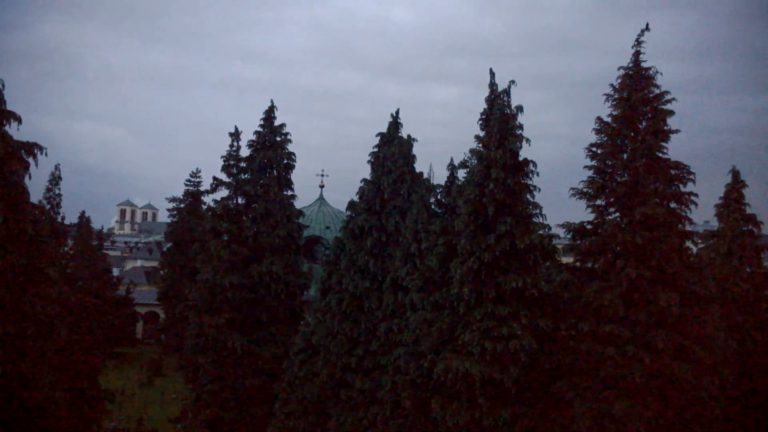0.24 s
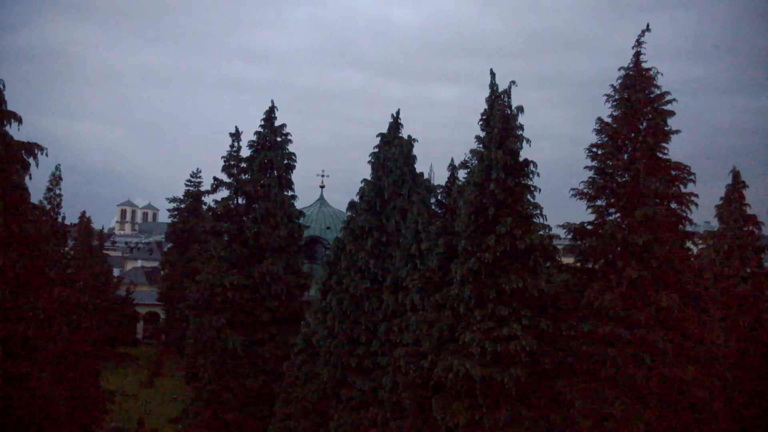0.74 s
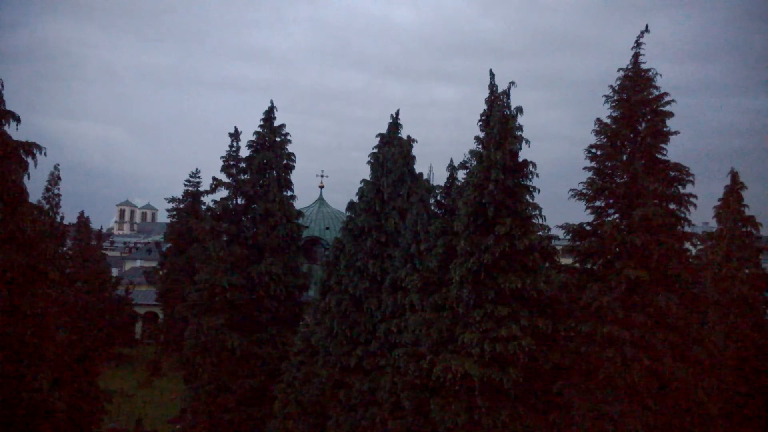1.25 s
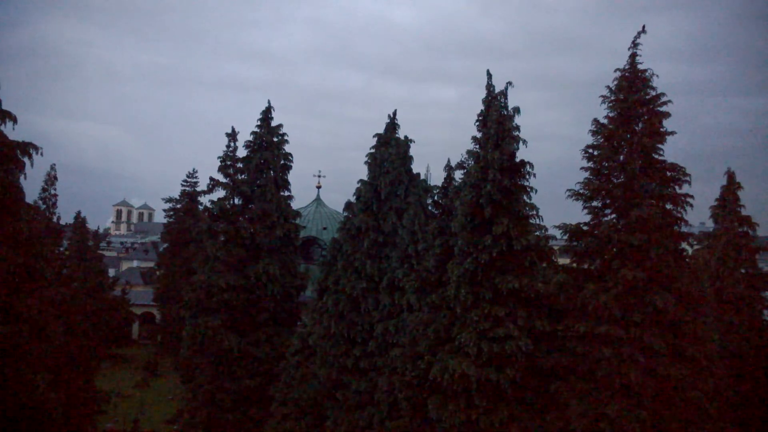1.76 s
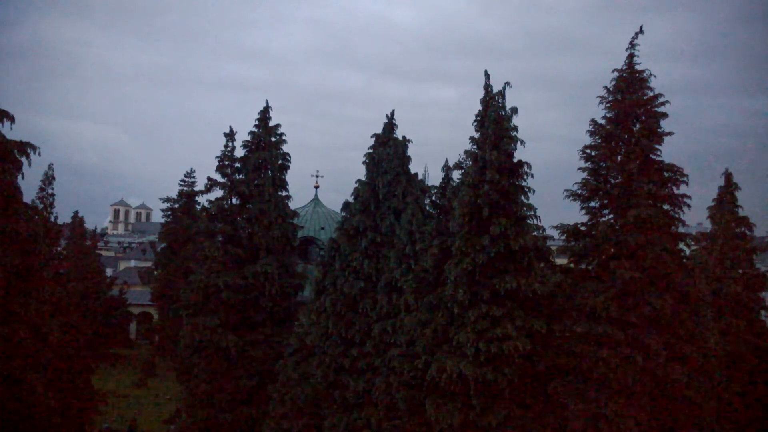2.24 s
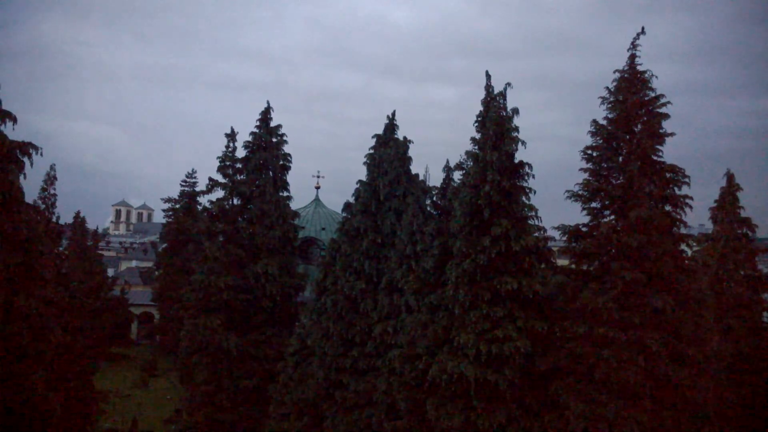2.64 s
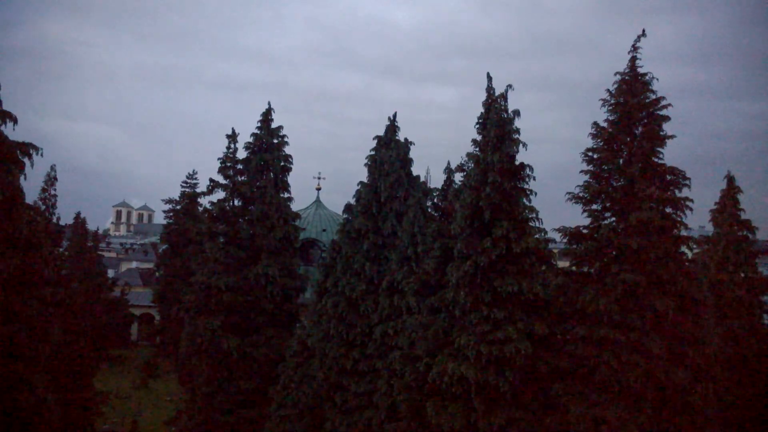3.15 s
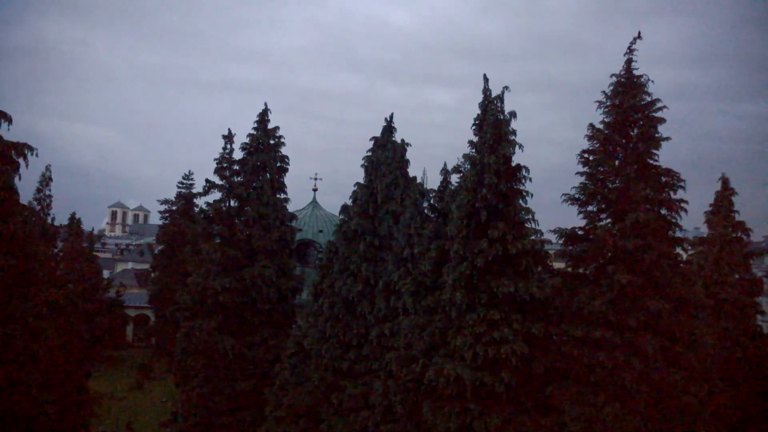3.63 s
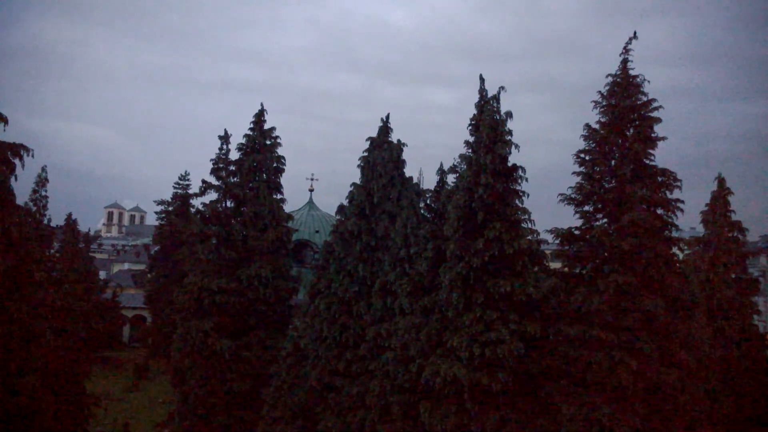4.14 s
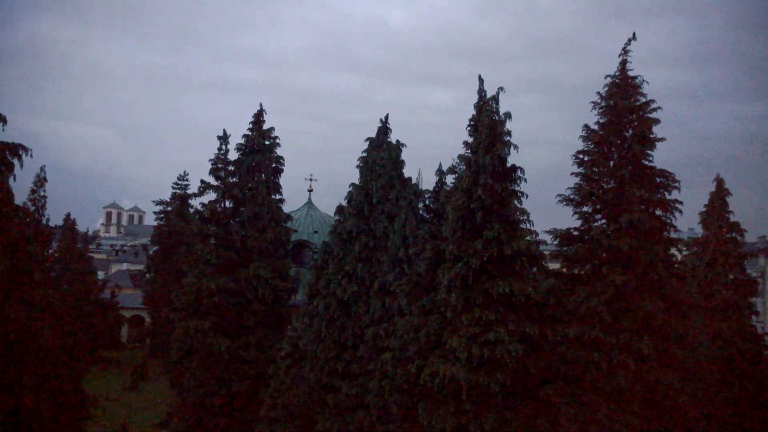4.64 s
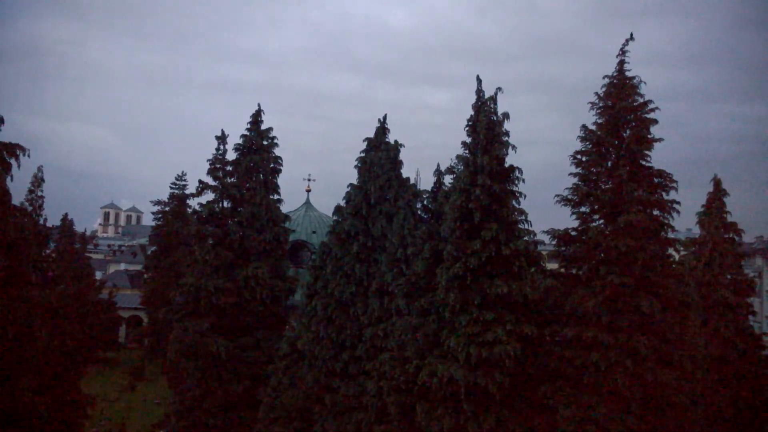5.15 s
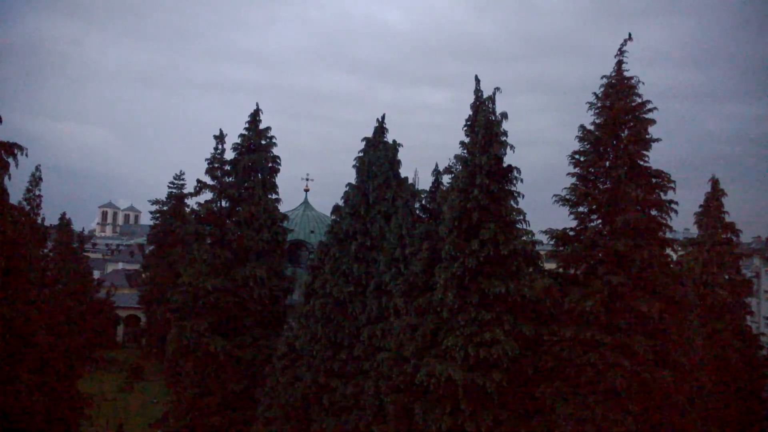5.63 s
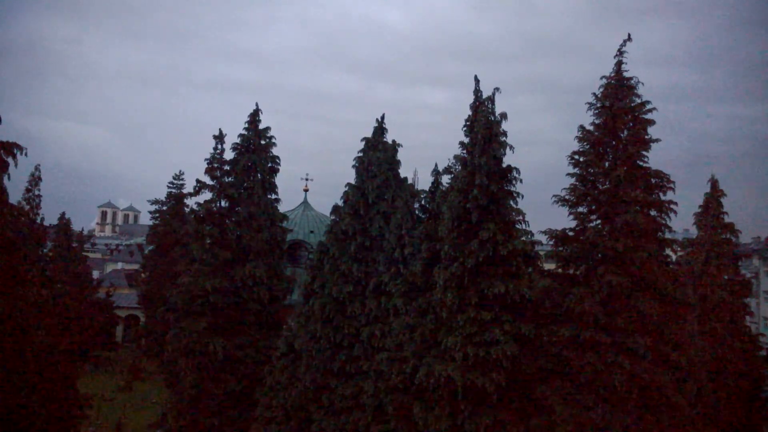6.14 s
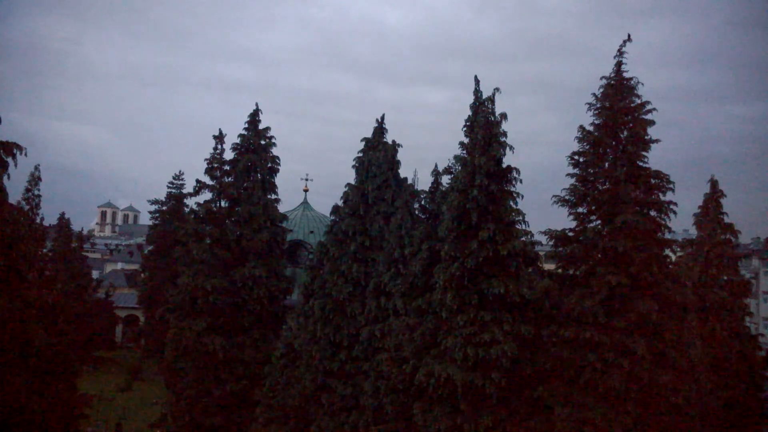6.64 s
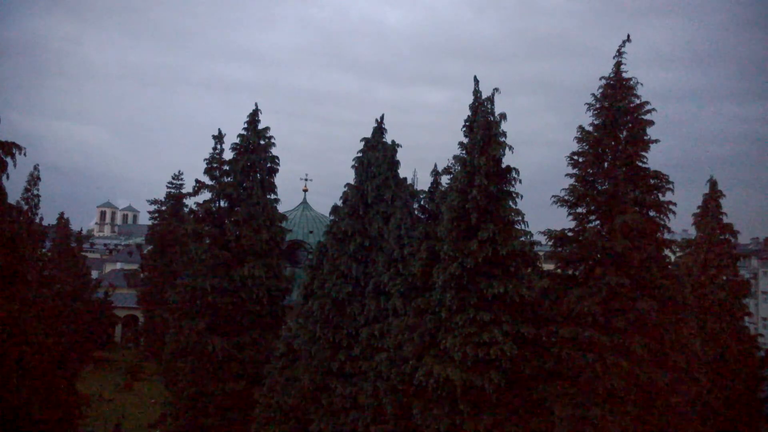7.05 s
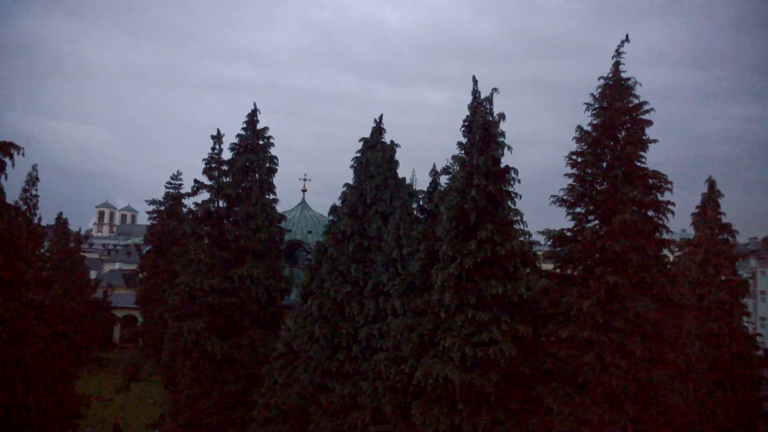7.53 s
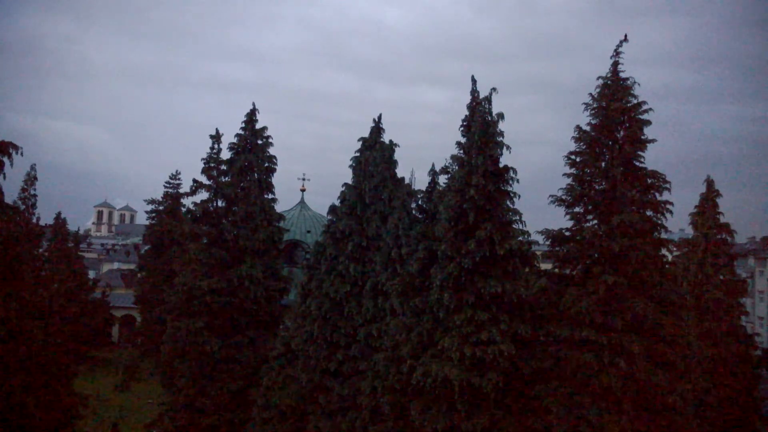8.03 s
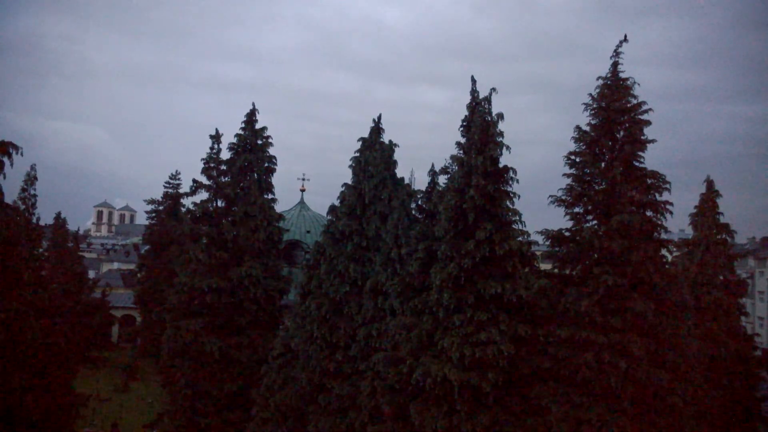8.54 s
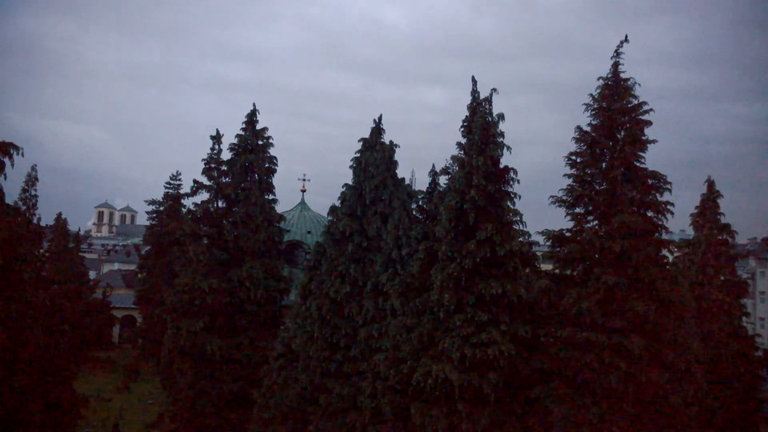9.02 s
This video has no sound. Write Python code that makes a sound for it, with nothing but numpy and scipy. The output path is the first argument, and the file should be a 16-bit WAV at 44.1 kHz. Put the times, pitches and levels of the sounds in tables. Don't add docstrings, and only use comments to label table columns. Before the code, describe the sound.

Outdoors among conifers at dawn, a nearby blackbird whistles, warbles and rasps in two phrases, with distant birds and faint steady traffic rumble behind.

```python
import sys
import numpy as np
from scipy import signal
from scipy.fft import rfft, irfft, next_fast_len
from scipy.io import wavfile
from scipy.ndimage import uniform_filter1d

SR = 44100
rng = np.random.default_rng(int(sys.argv[2]) if len(sys.argv) > 2 else 0)


def materialize(psi):
    bounded = np.clip(np.atleast_2d(psi).T, -1, 1)
    quanta = np.round(bounded * 32767).astype(np.int16)
    wavfile.write(sys.argv[1], SR, quanta)


def volts_from_db(level):
    exponent = np.asarray(level, float) / 20
    return 10 ** exponent


N = 409248


# time in seconds, pitch in Hz, level in dB.
CHIRPS = [
    [(2.9, 2920, -48.5), (2.93, 3210, -47.5), (2.955, 3310, -54)],
    [(8.655, 4400, -51), (8.68, 4150, -35), (8.7, 4070, -47)],
    [(8.72, 4300, -39.5), (8.745, 3894, -33.5), (8.77, 3045, -44), (8.81, 2730, -47.5)],
    [(8.608, 3750, -57), (8.63, 4050, -51), (8.655, 4150, -52)],
    [(8.645, 3250, -50), (8.67, 3150, -48)],
    [(8.635, 2450, -52), (8.68, 2600, -50), (8.7, 3400, -47), (8.725, 3250, -52)],
    [(8.765, 2050, -54), (8.805, 2250, -48)],
]
# start in seconds, length in seconds, from Hz, to Hz, level in dB.
HOARSE = [(3.31, 0.1176, 1820, 1970, -39.5), (4.885, 0.092, 4780, 4850, -51), (4.89, 0.09, 6150, 6100, -58),
          (4.875, 0.1, 2443, 2340, -50.5), (7.55, 0.073, 2820, 2900, -54), (9.12, .04, 3500, 3250, -56),
          (9.19, .03, 5750, 5500, -52), (9.215, .065, 8000, 7600, -59), (4.57, .07, 2050, 1950, -52),
          (9.195, .09, 4200, 3850, -47), (9.17, 0.045, 6050, 6000, -50.5), (9.205, .09, 5250, 4750, -43.5)]
# time in seconds, centre pitch in Hz, level in dB.
WARBLED = [
    [(2.73, 2304, -43.5), (2.78, 2505, -38), (2.85, 2368, -44.5)],
    [(2.99, 2193, -50), (3.035, 2302, -44), (3.088, 2373, -53.5)],
    [(3.13, 5380, -87), (3.15, 5220, -65), (3.17, 5700, -51)],
    [(7.305, 2330, -48), (7.35, 2320, -44), (7.397, 2205, -48)],
    [(7.55, 1436, -57.5), (7.625, 1490, -59)],
]
# turns per second, swing as a share of pitch,
# rising share of a turn, dB louder at the top.
WARBLES = [
    (114.4, 0.091, 0.45, 0.5),
    (31.15, 0.07, 0.415, 8),
    (100, 0.067, 1, 5),
    (31.83, 0.157, 0.27, -1),
    (60.5, 0.13, 0.31, 4.5),
]


def blackbird():
    clear = sing(fluted(), .003, 70, 1.7) + sing(WARBLED, .004, 90, 1.2, WARBLES)
    chirps = sing(CHIRPS, .022, 210, 2.4)
    calls = sing(chatter_strokes(), .012, 210, 2.4, edge_s=.003)
    hoarse = sing(shaped(HOARSE, HUSKY), 0.0284, 174, 1.1)
    tones, upper, level = clear + chirps + calls + hoarse
    return volts_from_db(6.5) * tones + volts_from_db(2.5) * rasp(upper, level)


# time in seconds, pitch in Hz, level in dB.
TURNS = [
    [(2.45, 2034, -58), (2.485, 1926, -41), (2.52, 2030, -43), (2.552, 2400, -40.5), (2.565, 2760, -51)],
    [(2.67, 2124, -54), (2.7, 2190, -39), (2.73, 2190, -39)],
    [(3.775, 2820, -52), (3.8, 3010, -41), (3.83, 2900, -43), (3.845, 2640, -45)],
    [(7.21, 2410, -54), (7.25, 2394, -41), (7.29, 2303, -42.5), (7.31, 2020, -49)],
    [(7.63, 2270, -46), (7.65, 2298, -36), (7.68, 2280, -49), (7.71, 2338, -32.5), (7.72, 2060, -48),
     (7.74, 1890, -43.5)],
    [(8.075, 1961, -44), (8.087, 2170, -41), (8.12, 1990, -37.5), (8.16, 1850, -44.5), (8.195, 1930, -48),
     (8.207, 2206, -33.5)],
    [(8.21, 2003, -49), (8.24, 2079, -42), (8.28, 1993, -42.5), (8.31, 1950, -35), (8.335, 1960, -53)],
    [(8.6, 2350, -50), (8.628, 2660, -45.5), (8.64, 3370, -47)],
]
# start in seconds, length in seconds, from Hz, to Hz, level in dB.
ROUNDED_NOTES = [(2.882, 0.071, 6830, 4160, -66), (3.415, 0.12, 2600, 2524, -39.5),
                 (3.525, .1, 1935, 1968, -39.5), (3.875, 0.11, 2575, 2507, -38),
                 (4.85, 0.13, 3776, 3746, -46.5), (7.4, 0.088, 2010, 1969, -39.5),
                 (7.915, 0.14, 1750, 2027, -38), (8.44, .105, 1880, 1613, -42.5),
                 (8.81, .11, 2197, 2153, -41.5), (8.97, 0.068, 2210, 2131, -42.5),
                 (9.035, 0.069, 1796, 1878, -45.5)]
SWELLING_NOTES = [
    (2.93, 0.046, 2200, 2058, -34.5),
    (3.62, .045, 2580, 2538, -40),
]
FADING_NOTES = [
    (3.17, 0.067, 5930, 5984, -44),
]


def fluted():
    rounded = shaped(ROUNDED_NOTES, ROUNDED)
    swelling = shaped(SWELLING_NOTES, CRESTING)
    fading = shaped(FADING_NOTES, FADING)
    return TURNS + rounded + swelling + fading + chatter(CHATTER_PURE, CRESTING)


# seconds after its start, length in seconds, from Hz, to Hz, level in dB.
CHATTER = [
    (0, .03, 4130, 3544, -46.5),
    (.036, .018, 3714, 1807, -51),
    (.055, 0.0412, 1295, 1924, -56),
    (.055, .028, 1893, 2566, -50),
    (.036, .012, 4800, 2700, -51),
    (.025, .025, 3700, 3800, -52),
    (.05, .025, 2900, 3300, -55),
    (.082, .014, 2500, 1950, -52),
]
CHATTER_PURE = [
    (.008, 0.021, 2644, 2430, -42),
    (.11, .058, 2140, 2550, -34),
]
CHATTER_DROP = [
    (.168, .04, 2300, 1100, -59),
]
CHATTER_FLICK = [
    (.16, .03, 3750, 3200, -55),
]


def chatter_strokes():
    drop = chatter(CHATTER_DROP, LEVEL, count=1)
    flick = chatter(CHATTER_FLICK, LEVEL, count=2)
    return chatter(CHATTER, LEVEL) + drop + flick


# start in seconds, level in dB.
CHATTER_AT = [
    (4.099, -1.5),
    (4.39, -2.5),
    (4.705, -5),
]


def chatter(strokes, law, count=3):
    rows = [np.add(row, (s, 0, 0, 0, db)) for s, db in CHATTER_AT[:count] for row in strokes]
    return shaped(rows, law)


# start in seconds, end in seconds,
# treble in dB, scratch below it in dB.
HISSING = [(2.427, 2.62, -67, -2), (2.69, 2.86, -60, -5.5), (2.922, 3.079, -62.5, -1),
           (3.292, 3.462, -59, -13), (4.186, 4.316, -66, 11.5), (4.496, 4.59, -67, 11),
           (4.813, 4.886, -74, 11), (7.293, 7.494, -63, -9), (7.949, 8.063, -60.5, -10),
           (8.071, 8.365, -58, -12), (8.6, 8.66, -60, 4), (8.63, 8.81, -47.5, 7), (8.79, 8.935, -57.5, -1),
           (8.8, 9.16, -80, 21), (4.14, 4.36, -88, 21), (4.43, 4.66, -88, 21)]
RASPING = [
    (0, 0.044, -63.5, -8),
    (3.422, 3.525, -66, 0),
    (3.516, 3.669, -59.5, -13),
    (3.791, 3.857, -74, 17.5),
    (3.892, 3.97, -76.5, 21),
    (7.593, 7.788, -64, -2),
    (8.37, 8.543, -62.5, -6),
]
GRATING = [
    (3.135, 3.165, -45, -25),
    (3.165, 3.25, -47, -25),
    (4.094, 4.152, -55.5, 2.5),
    (4.378, 4.444, -57, 7.5),
    (4.697, 4.754, -63.5, 4),
    (4.869, 5.0, -56, 1),
    (9.002, 9.1, -63.5, -20),
    (9.186, 9.29, -49, -10),
]
OVERTONE_SHARES = (.14, .36, .94)
# frequency in Hz, level in dB per Hz.
TREBLE = [(3200, -22), (4000, -4), (6000, -42), (7800, -29), (9200, -11.5), (11100, 4.5), (13500, -6),
          (15800, -21)]
SCRATCH = [(1700, -30), (2900, 15), (4200, 13), (5000, 4), (6500, 4), (8000, 6), (10000, -11), (15000, -35)]


def rasp(upper, level):
    t = np.arange(0, N + 64, 64) / SR
    effort = np.zeros((3, len(t)))
    for rows, share in zip((HISSING, RASPING, GRATING), OVERTONE_SHARES):
        for start, end, db, scratch_db in rows:
            u = np.clip((t - start + 0.003) / (end - start + 0.03), 0, 1)
            burst = volts_from_db(db) * np.sin(np.pi * u ** 0.7) ** 0.88
            effort += burst * np.array([[np.sqrt(1 - share)], [np.sqrt(share)], [volts_from_db(scratch_db)]])
    hiss, edge, scratch = [np.interp(np.arange(N) / SR, t, e) for e in effort]
    leading = upper / (level + volts_from_db(-36.5))
    lines = volts_from_db(11.5) * coloured(leading, lambda hz: volts_from_db(read(TREBLE, hz)) + volts_from_db(-13.5) * (hz < 9000))
    return hiss * patchy_noise(TREBLE, 5.1) + edge * lines + scratch * patchy_noise(SCRATCH, 7.2)


# share of length at the loudest, dB at start, dB at end,
# quarter turns of pitch (near 0 straight, 1 settles, 2 returns).
ROUNDED = (0.3, -10, -8, 1.4)
FADING = (0.37, -3.5, -16.5, 1.07)
CRESTING = (0.57, -15.5, -5.5, .5)
LEVEL = (-2.7, 2, 4, 0.96)
HUSKY = (0.5, -8, -12.5, 0.64)
ARCHED = (.55, -4, -5, 1.95)


def shaped(rows, law):
    top, start_db, end_db, turns = law
    u = np.linspace(0, 1, num=13)
    turns = np.clip(turns, .05, 2) * np.pi / 2
    glide = np.sin(turns * u) / np.sin(min(turns, np.pi / 2))
    swell_db = np.interp(u, [0, np.clip(top, .05, .95), 1], [start_db, 0, end_db])
    return [np.transpose([start + length * u, low + (high - low) * glide, db + swell_db])
            for start, length, low, high, db in rows]


def sing(notes, drift, drift_hz, shake_db, warbles=None, edge_s=.005):
    lead = SR // 10
    out = np.zeros((3, N + SR))
    for k, rows in enumerate(notes):
        s, hz, db = np.transpose(rows)
        t = np.arange(s[0] - edge_s, s[-1] + edge_s, 1 / SR)
        pitch = np.interp(t, s, hz) * (1 + drift * wander(len(t), drift_hz))
        loud_db = np.interp(t, s, db) + shake_db * wander(len(t), drift_hz)
        if warbles:
            rate, swing, rise, top_db = warbles[k]
            turn = np.sin(np.pi / 2 * signal.sawtooth(2 * np.pi * rate * (t - s[0]), rise))
            pitch *= 1 + swing * turn
            loud_db += top_db * turn
        phase = 2 * np.pi * (np.cumsum(pitch) / SR + rng.random())
        to_edge = np.minimum(t - t[0], t[-1] - t)
        edges = np.sin(np.pi / 2 * np.clip(to_edge / (2 * edge_s), 0, 1)) ** 2
        level = np.sqrt(2) * volts_from_db(loud_db) * edges
        blurred = phase + 0.21 * wander(len(t), 150)
        upper = sum(np.cos(n * blurred) * (n * pitch < SR / 2.6) for n in range(2, 9))
        upper = upper * np.sqrt(pitch / 2000)
        at = round(t[0] * SR) + lead
        out[:, at:at + len(t)] += level * np.array([np.sin(phase), upper, np.ones(len(t))])
    return out[:, lead:lead + N]


# start in seconds, length in seconds, from Hz, to Hz, level in
# dB.
FAR_FADING = [(0, 0.038, 6920, 6510, -45), (1.915, 0.11, 4720, 4570, -48), (2.115, 0.14, 4770, 4490, -50),
              (2.355, 0.072, 4820, 4550, -47), (3.87, .05, 1900, 1254, -46), (5.41, .07, 3930, 3050, -59),
              (5.375, 0.049, 3970, 3980, -53), (5.585, 0.092, 2226, 2174, -44),
              (5.63, 0.12, 1795, 2067, -45.5), (6.23, 0.06, 1900, 1600, -52), (6.075, .03, 4000, 3700, -55),
              (6.21, .03, 3800, 3350, -55), (1.53, .04, 2380, 2050, -54), (6.79, 0.17, 2148, 2017, -52.5),
              (7.41, 0.082, 2634, 2520, -53)]
FAR_LEVEL = [(1.5, 0.13, 2050, 1826, -57.5), (1.6, 0.14, 1850, 1834, -58.5),
             (1.75, 0.15, 1800, 1618, -55.5), (2.07, 0.1, 2270, 2028, -55), (2.42, .28, 3125, 3360, -66),
             (3.73, 0.057, 2600, 1945, -50), (3.84, 0.119, 2920, 2766, -49),
             (3.92, 0.09, 1500, 1826, -51.5), (4.305, 0.071, 2090, 2117, -44),
             (5.53, 0.066, 1820, 1923, -47), (5.91, 0.04, 2457, 2250, -53.5), (5.945, .02, 2400, 2150, -55),
             (5.965, .025, 2350, 2100, -56), (6.015, .04, 2370, 2340, -59), (6.12, .04, 3850, 4250, -63),
             (6.235, .08, 3400, 3420, -60), (6.41, .11, 1980, 2170, -59), (6.61, .09, 3300, 3300, -72),
             (1.85, .05, 1600, 1880, -57), (1.22, .05, 3100, 3080, -74), (1.41, .08, 3050, 2850, -76),
             (1.76, .04, 3800, 3780, -70), (6.05, 0.138, 1846, 1928, -60), (6.62, 0.093, 1767, 1951, -53.5),
             (6.74, 0.089, 1817, 1940, -60), (1.6, 0.12, 2060, 2090, -53.5), (6.168, 0.03, 3680, 4590, -56),
             (6.31, 0.076, 2292, 2216, -47.5), (7.05, 0.23, 1800, 1880, -61),
             (8.09, .06, 3210, 3060, -58.5), (8.12, .07, 2850, 2760, -58.5)]
FAR_ARCHED = [
    (1.15, .17, 1300, 1690, -50),
    (1.93, 0.15, 2250, 2126, -48),
    (2.3, 0.104, 1927, 1747, -51),
    (4.66, 0.17, 2850, 2690, -50),
]
FAR_HUSKY = [
    (5.12, .12, 1830, 1750, -53),
    (5.24, .12, 1750, 1900, -53),
    (5.34, .09, 1920, 1830, -49),
    (5.6, .14, 1900, 2050, -52),
]
FAR_BUZZES = [(.25, 0.08, 4010, 3810, -61.5), (.4, 0.087, 3900, 3820, -60), (.645, 0.029, 3700, 3380, -66),
              (.71, 0.03, 3900, 4350, -61.5), (.785, 0.053, 3800, 3800, -64), (2.1, 0.27, 3100, 3100, -74),
              (5.67, 0.083, 3890, 3820, -63.5), (5.84, 0.087, 3900, 4100, -60),
              (6.05, 0.05, 3300, 3500, -65), (6.58, .03, 4100, 3900, -61), (1.82, .08, 3600, 3500, -70),
              (6.21, .11, 3400, 3300, -61)]


def far_birds():
    notes = shaped(FAR_FADING, FADING) + shaped(FAR_LEVEL, LEVEL) + shaped(FAR_ARCHED, ARCHED)
    clear = sing(notes, .006, 80, 2.5, edge_s=.012)[0]
    husky = sing(shaped(FAR_HUSKY, LEVEL), .03, 150, 3, edge_s=.02)[0]
    shakes = [(122.0, 0.07, 0.36, 0.82)] * len(FAR_BUZZES)
    buzzes = sing(shaped(FAR_BUZZES, LEVEL), 0.03, 230, 1.6, shakes, edge_s=0.012)[0]
    return clear + husky, buzzes


# frequency in Hz, time to fall 60 dB in seconds.
GROVE = [(1500, 1.84), (3200, 1.6), (4200, 1.2), (6000, .5), (10400, 0.04)]


def grove(x, start_s, length_s, speed):
    taps = np.zeros((2, round(length_s * SR)))
    grid = np.arange(round(start_s * SR), taps.shape[1] - 20, 20)
    places = grid + rng.integers(0, 20, (2, len(grid)))
    np.put_along_axis(taps, places, rng.choice([-1., 1.], (2, len(grid))), 1)
    hz, t, z = signal.stft(taps, SR, nperseg=256)
    dying = volts_from_db(-60 * speed * t / read(GROVE, hz)[:, None])
    tail = signal.istft(z * dying, SR, nperseg=256)[1]
    return signal.fftconvolve(x[None], tail / np.linalg.norm(tail[0]), axes=1)[:, :N]


# start in seconds, length in seconds, centre in Hz, level in dB.
RUSTLES = [(.197, .02, 12000, -68), (.577, .015, 10500, -75), (.82, .12, 10000, -80),
           (5.517, .04, 9000, -70), (5.576, .05, 8500, -69), (5.66, .07, 8500, -71),
           (6.742, .02, 11000, -63), (1.05, .04, 8000, -76), (1.228, .025, 8700, -70),
           (1.312, .012, 10000, -74), (1.43, .04, 10000, -73), (1.5, .12, 9800, -60.5),
           (1.726, .012, 11000, -72), (2.1, .05, 11000, -77), (2.165, .06, 9200, -70),
           (2.296, .01, 11000, -71), (5.363, .015, 10000, -75), (6.298, .02, 10000, -72),
           (6.48, .03, 10000, -75)]


def rustles():
    out = np.zeros((2, N))
    for start, length, hz, db in RUSTLES:
        t = np.arange(0, 2.5 * length + .01, 1 / SR)
        shared, own = rng.standard_normal(len(t)), rng.standard_normal((2, len(t)))
        band = signal.butter(1, [hz * .78, min(hz * 1.25, SR / 2.5)], "band", fs=SR, output="sos")
        shape = np.minimum(t / (.08 * length + .0005), 1) * volts_from_db(-14 * (t / length) ** 2.2)
        at = round(start * SR)
        out[:, at:at + len(t)] += volts_from_db(db) * shape * evened(signal.sosfilt(band, shared + .8 * own))
    return out


# frequency in Hz, level in dB per Hz.
TOWN = [(25, 3.5), (130, -2.5), (220, -11.5), (320, -11.5), (430, -19), (1590, -17.5), (3570, -23),
        (15800, -40.5)]
# frequency in Hz, likeness from -1 to 1.
TOWN_SAME = [(60, 0.95), (180, 0.93), (550, 0.64), (1650, 0.0059), (4970, 0.092), (15000, -0.3)]
# frequency in Hz, width in Hz, level in dB.
HUMS = [
    (50.3, 3.2, -59.5),
    (113.9, 16.8, -64),
    (144, 8.6, -67.5),
]
# frequency in Hz, left minus right in dB.
TOWN_PORT_DB = [(60, 2), (150, 1.5), (380, 0), (950, 7.5), (2380, 5), (5980, 0), (15000, -4)]


def town():
    frames, hz = N // 512 + 5, np.fft.rfftfreq(2048, 1 / SR)
    a, b, c, d, patches = rng.standard_normal((frames, 1025, 5)).T
    patches = evened(uniform_filter1d(uniform_filter1d(patches, 30, 0), 8, 1))
    breeze = evened(uniform_filter1d(rng.standard_normal(frames), size=4))
    gust_db = 1.5 * breeze * np.clip(hz / 5000 - .6, 0, 1)[:, None]
    same = np.clip(read(TOWN_SAME, hz), -1, 1)[:, None]
    left = a + 1j * b
    z = np.array([left, same * left + np.sqrt(1 - same ** 2) * (c + 1j * d)])
    z *= volts_from_db(read(TOWN, hz)[:, None] + 2.0 * patches + gust_db)
    wash = volts_from_db(-54) * evened(signal.istft(z, nperseg=2048, noverlap=1536)[1][:, :N])
    t = np.arange(N) / SR
    hums = np.zeros(N)
    for f, width, db in HUMS:
        cosine = wander(N, width) * np.cos(2 * np.pi * f * t)
        hums += volts_from_db(db) * (cosine + wander(N, width) * np.sin(2 * np.pi * f * t))
    return ports(wash + hums, TOWN_PORT_DB, 0)


def ports(pair, balance, lag_s):
    side = np.array([[.5], [-.5]])

    def gain(hz):
        return volts_from_db(side * read(balance, hz)) * np.exp(-2j * np.pi * hz * lag_s * (side + .5))
    return coloured(pair, gain)


def patchy_noise(colour, patchy_db):
    hz = np.fft.rfftfreq(256, 1 / SR)
    a, b, patches = rng.standard_normal((N // 128 + 3, 129, 3)).T
    patches = evened(uniform_filter1d(uniform_filter1d(patches, 6, 0), 9, 1))
    z = (a + 1j * b) * volts_from_db(read(colour, hz)[:, None] + patchy_db * patches)
    return evened(signal.istft(z, nperseg=256, noverlap=128)[1][:N])


def read(points, hz):
    f, value = np.transpose(points)
    return np.interp(np.log(hz + 1), np.log(f + 1), value)


def evened(x):
    return x / np.sqrt(np.mean(x ** 2) + 1e-20)


def wander(length, hz):
    slow = signal.butter(2, hz, fs=SR, output="sos")
    return evened(signal.sosfilt(slow, rng.standard_normal(length + 2000))[2000:])


def coloured(x, gain):
    size = next_fast_len(N + 2048)
    return irfft(rfft(x, size) * gain(np.fft.rfftfreq(size, 1 / SR)), size)[..., :N]


# frequency in Hz, left minus right in dB.
PORT_DB = [(1200, 10), (1900, 1), (2700, -2.5), (4200, 3), (6400, -8), (9800, -21), (15000, -5)]
RIGHT_PORT_DB = [(1200, 6), (1900, 0), (2700, -3), (4200, 2), (6400, -2)]
# from seconds, to seconds.
AHEAD = [
    (1.9, 2.45),
    (5.1, 5.5),
    (6.6, 7.0),
]


def scene():
    near, (whistles, buzzes) = blackbird(), far_birds()
    stir = .5 + .85 * wander(N, 110)
    branches = grove(near, .002, .08, 10.5)
    dulled = coloured(near, lambda hz: 1 / (1 + (hz / 6000) ** 2))
    wall = grove(dulled, .108, 0.17, 17.0)
    tail = grove(near * stir, .01, 1.1, 1.2)
    song = near + volts_from_db(-7.5) * branches + volts_from_db(-26.5) * wall + volts_from_db(-14) * tail
    chorus = whistles + volts_from_db(-12.0) * grove((whistles + buzzes) * stir, .004, .9, 1.5)
    t = np.arange(N) / SR
    ahead = uniform_filter1d(sum(1. * (a < t) * (t < b) for a, b in AHEAD), size=2000)
    right = ports(volts_from_db(1.5) * chorus * (1 - ahead) + volts_from_db(2.5) * buzzes, RIGHT_PORT_DB, 0.00033)
    middle = ports(volts_from_db(-4.5) * chorus * ahead + rustles(), TOWN_PORT_DB, 0)
    near_right = ports(song, PORT_DB, 0.000388)
    return near_right + middle + right + town()


def low_pass(x):
    return signal.sosfilt(signal.butter(12, 15900, fs=SR, output="sos"), x)


def record(dry):
    thin = coloured(dry, lambda hz: 1 / (1 + (28.8 / (hz + 1)) ** 6))
    return low_pass(thin)


dry = scene()
out = record(dry)
materialize(out)
```